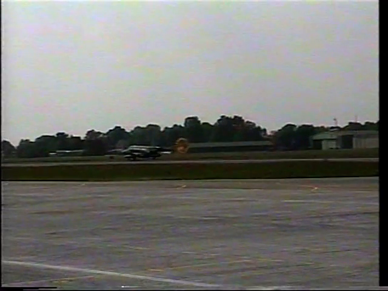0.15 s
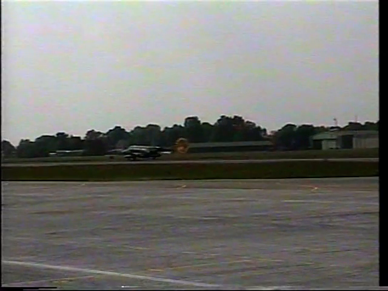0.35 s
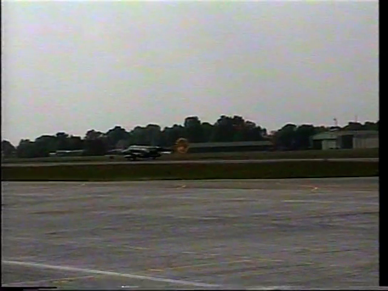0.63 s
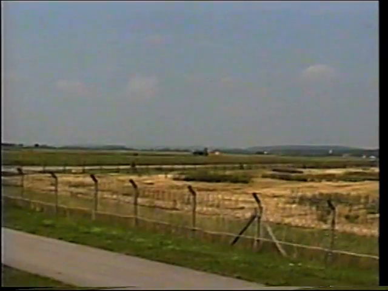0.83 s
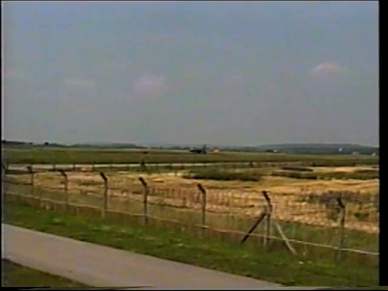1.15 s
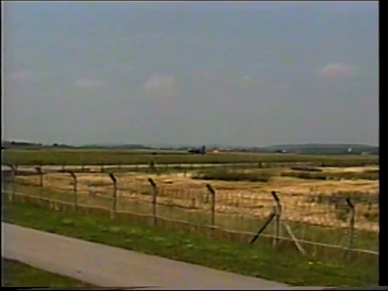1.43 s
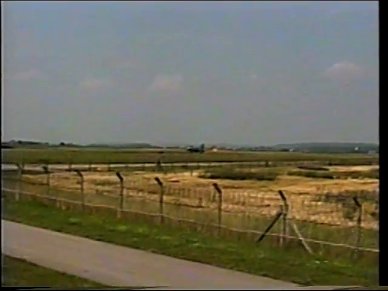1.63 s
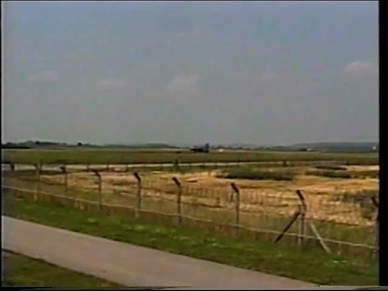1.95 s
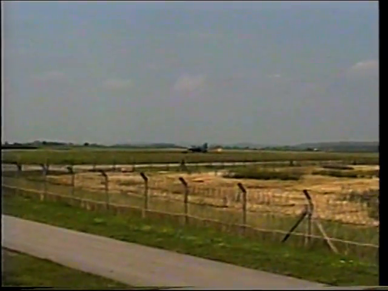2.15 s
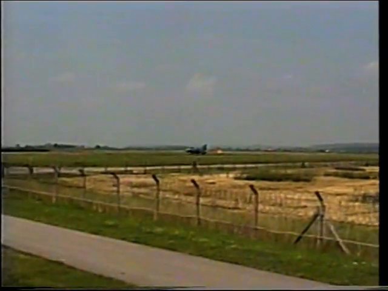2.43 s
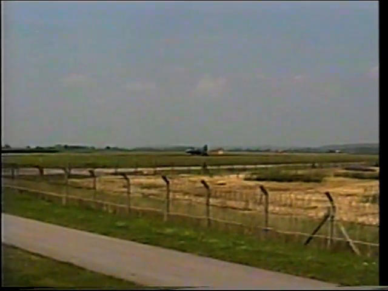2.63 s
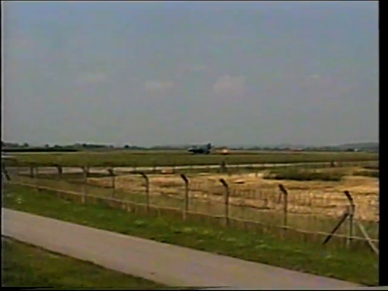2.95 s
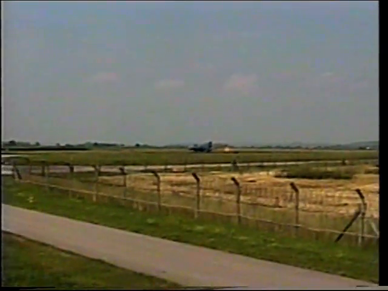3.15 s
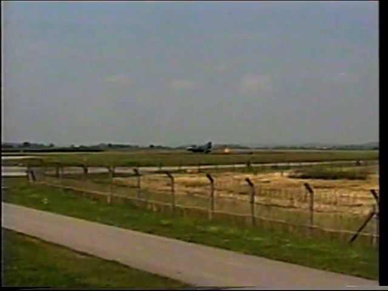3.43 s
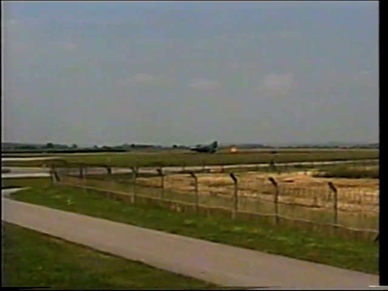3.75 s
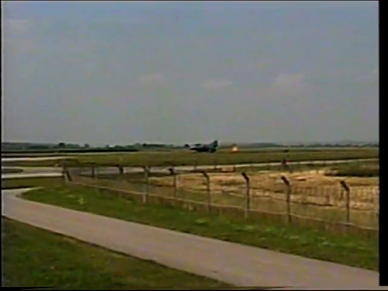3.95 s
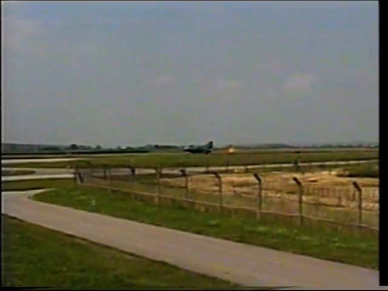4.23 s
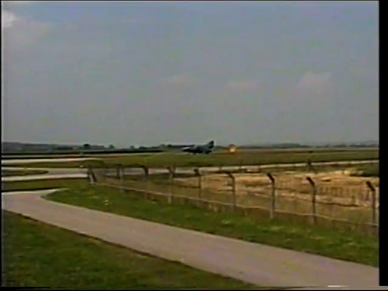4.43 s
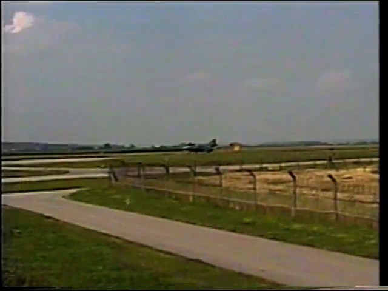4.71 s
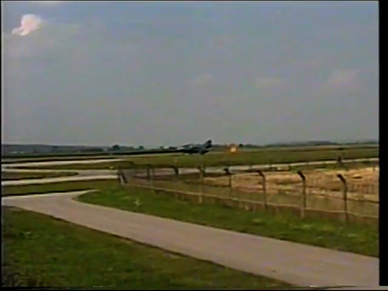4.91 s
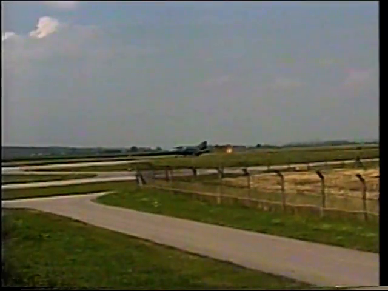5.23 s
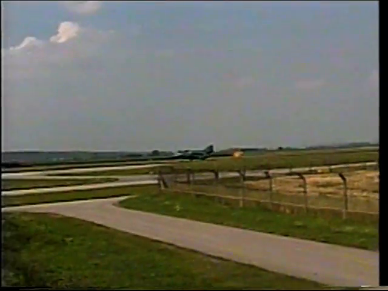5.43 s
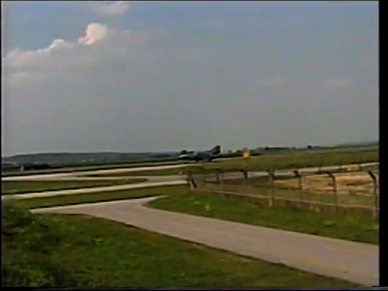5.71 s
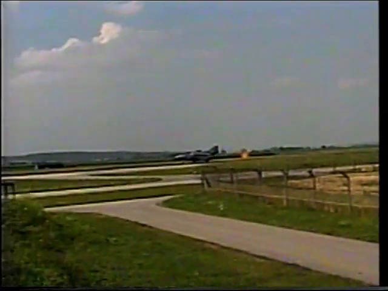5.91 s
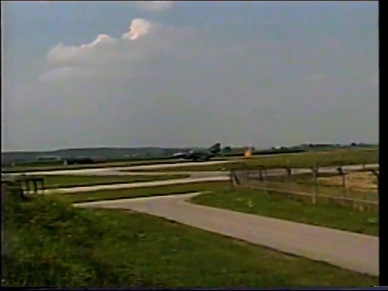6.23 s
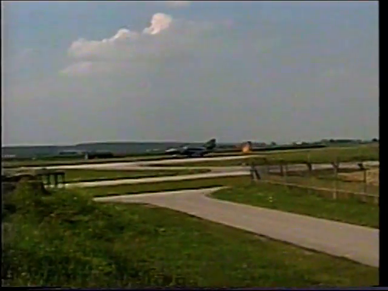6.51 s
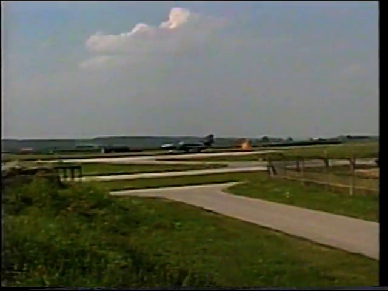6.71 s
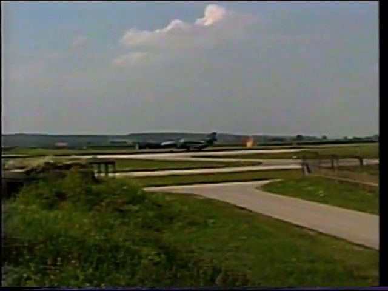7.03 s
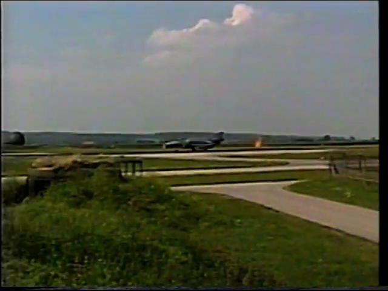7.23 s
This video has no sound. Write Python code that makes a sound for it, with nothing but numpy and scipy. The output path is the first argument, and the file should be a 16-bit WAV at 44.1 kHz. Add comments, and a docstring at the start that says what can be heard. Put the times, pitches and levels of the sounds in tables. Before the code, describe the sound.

A sudden cut-in from silence to a distant taxiing jet: wavering compressor whine gliding down, windy rush, faint insect rasp, then a louder finish.

```python
"""After a moment of silence a tape camcorder fades in quickly, with its own line whistle, frame buzz, hum and hiss.
A jet fighter is rolling along a runway after landing: compressor tones on multiples of the shaft speed sink
in pitch and fade in the restless air, over exhaust roar, intake hiss and low rumble, all of shaped noise.
A grasshopper rasps for the first second, two faint ticks follow, and the jet dips briefly.
It comes slowly nearer over open grass; late on, whine, intake noise and frame buzz swell."""
import sys
import numpy as np
from scipy import signal
from scipy.fft import rfft, irfft, next_fast_len
from scipy.io import wavfile
from scipy.ndimage import uniform_filter1d

SR = 44100
rng = np.random.default_rng(int(sys.argv[2]) if len(sys.argv) > 2 else 0)


def store_wav(level_fs):
    """Save 16-bit WAV to argv[1]."""
    pcm = np.round(np.clip(np.atleast_2d(level_fs), -1, 1) * 32767)
    wavfile.write(sys.argv[1], SR, pcm.T.astype(np.int16))


N = 324576
TIME = np.arange(N) / SR   # s

# tape hiss spectrum: (frequency [Hz], density [dB per Hz])
TAPE_HISS_SPECTRUM = [(3000, -2.5), (5000, 2.5), (7500, 4.5), (10000, -0.5), (13000, -4), (15500, -6)]
# gain of the frame buzz: (time [s], gain [dB])
FRAME_BUZZ_GAIN = [(0.75, -65), (6.3, -53), (6.65, -42), (6.85, -27.5), (7.1, -32), (7.36, -37)]
# hum at the field rate: (multiple of field rate [-], level [dB])
FIELD_HUM = [(1, -68), (2, -66)]
FRAME_HZ, LINE_HZ = 25, 15625.3
FRAME_START_S, BLANK_S = .0126, .0016
LINE_DB, TAPE_DB = -58.5, -70.5   # before ripple and flutter
START_S, FADE_S, CUTOFF_HZ = 0.7265, 0.024, 15780

# airfield rumble spectrum: (frequency [Hz], density [dB per Hz])
RUMBLE_SPECTRUM = [(20, -15), (35, -9), (55, -5), (90, -3), (130, -2), (200, -2.5), (400, -11.5)]
# airfield rumble: (time [s], level [dB])
RUMBLE_LEVEL = [(0.76, -48.5), (1.7, -53), (2.3, -53), (3.6, -50.5), (4.4, -49), (5.3, -53.5), (6.4, -53.5),
                (7.36, -55.5)]

# grasshopper strokes: run, rate, Gaussian width of a stroke, level, band
CHIRP_START_S, CHIRP_END_S, CHIRPS_PER_S = .79, 1.78, 17.8
CHIRP_SIGMA_S, CHIRP_DB, CHIRP_BAND_HZ = 0.0041, -69.5, (6530, 8160)
# faint sharp ticks: (time [s], gain before the band filter [dB])
TICK_GAINS = [(3.264, -45), (3.726, -40.5)]

# exhaust roar spectrum: (frequency [Hz], density [dB per Hz])
ROAR_SPECTRUM = [(90, -35), (140, -20.5), (185, -5.5), (245, -0.5), (300, -6), (380, -17.5), (600, -24.5)]
# low exhaust roar: (time [s], level [dB])
ROAR_LEVEL = [(0.76, -47.5), (1.3, -38), (1.54, -44), (2.74, -47.5), (2.84, -56.5), (3.32, -54),
              (3.54, -42), (3.96, -44), (4.04, -47.5), (4.7, -49.5), (5.32, -53), (6.46, -38.5),
              (6.75, -45), (7.36, -42)]
# hump of the roar, shifting as the path over the ground changes: (time [s], frequency [Hz])
ROAR_HUMP = [(0.75, 239), (1.3, 236), (1.8, 200.7), (2.4, 206.1), (3.0, 222.6), (3.7, 231.2), (4.3, 240.6),
             (4.8, 231.5), (5.3, 268.8), (5.9, 285), (6.4, 284.1), (6.9, 253.5), (7.36, 245.9)]
ROAR_CENTRE_HZ = 245   # hump of the unshifted roar
# mixing-jet rush spectrum: (frequency [Hz], density [dB per Hz])
JET_RUSH_SPECTRUM = [(250, -1), (400, 5), (520, 4.5), (750, 5), (1000, 2.5), (1250, -5), (1500, -15),
                     (2200, -20.5)]
# broad rush of the mixing jet: (time [s], level [dB])
JET_RUSH_LEVEL = [(0.76, -49.5), (0.92, -50.5), (1.28, -42.5), (1.52, -50), (2.28, -52.5), (2.6, -49),
                  (3.26, -52.5), (3.56, -49), (4.76, -50), (5.22, -47), (6.14, -47.5), (6.34, -43),
                  (7.36, -39)]

# intake rush spectrum, around the whine: (frequency [Hz], density [dB per Hz])
INTAKE_RUSH_SPECTRUM = [(1200, -5.5), (1450, -4.5), (1650, -4.5), (1850, 4), (2100, 4.5), (2400, -2.5),
                        (2800, 2), (3070, -8.5), (3400, -21)]
# intake hiss spectrum, above the whine: (frequency [Hz], density [dB per Hz])
INTAKE_HISS_SPECTRUM = [(2900, -12.5), (3100, 4.5), (3350, 6.5), (3900, 1.5), (4800, 0.5), (5400, -7.5),
                        (6100, -16.5), (7200, -14.5), (9000, -27), (13000, -42.5)]
# intake noise, swelling as the jet comes nearer: (time [s], rush level [dB], hiss level [dB])
INTAKE_LEVELS = [(0.76, -57, -63.5), (2.24, -54, -60.5), (2.34, -52, -60.5), (2.52, -51.5, -57),
                 (2.6, -55.5, -59), (2.8, -52, -56), (3.4, -53, -59.5), (4.52, -51, -55),
                 (4.78, -47.5, -51), (4.92, -47, -52), (5.28, -49.5, -53.5), (5.42, -46.5, -47),
                 (5.58, -45, -52.5), (5.8, -49, -55), (5.9, -46, -49.5), (6.06, -43, -52.5),
                 (6.38, -49.5, -55), (6.6, -44.5, -50.5), (6.86, -35, -41.5), (7.36, -39.5, -46)]
# hiss tilt: base slope [dB/octave]; below FULL_BRIGHT_DB it dulls by DULLING [dB/octave per dB]
BRIGHT_TILT_DB, FULL_BRIGHT_DB, DULLING = 1.3, -55, 1.23
GUST_DB, GUST_PER_S = 1.13, 13

# shaft speed as heard: (time [s], speed [turns/s])
SHAFT_SPEED = [(0.73, 283.63), (1.4, 281.55), (2.1, 279.84), (2.8, 278.26), (3.6, 276.34), (4.3, 273.89),
               (5, 271.3), (5.6, 269.99), (6.2, 267.46), (6.8, 265.16), (7.36, 262.81)]
LOWER_ORDER, UPPER_ORDER = 7, 9   # strong blade tones, multiples of the shaft speed
# lower blade tone, swelling with the wind and the approach: (time [s], level [dB])
LOWER_TONE_LEVEL = [(0.76, -54.5), (0.98, -49.5), (1.26, -50.5), (1.32, -44), (1.78, -54), (2.0, -41.5),
                    (2.2, -53), (2.3, -41.5), (2.58, -47.5), (2.78, -43.5), (3.74, -51), (3.82, -43.5),
                    (4.08, -56.5), (4.5, -48.5), (4.92, -41.5), (5.38, -36.5), (5.76, -45), (5.96, -39.5),
                    (6.46, -48.5), (6.94, -27), (7.26, -38.5), (7.36, -31.5)]
# upper blade tone: (time [s], level [dB])
UPPER_TONE_LEVEL = [(0.76, -63), (2.5, -47.5), (2.62, -57.5), (2.78, -42), (2.98, -57), (4.34, -58.5),
                    (4.88, -48), (5.26, -57), (6.12, -44), (6.3, -52.5), (6.66, -46), (6.82, -33.5),
                    (7.36, -34.5)]
# weaker engine tones: (multiple of shaft speed [-], level re intake rush [dB], width [Hz])
WEAK_TONES = [(8, -13, 5.5), (10, -9.5, 15.4), (11, -19, 3.8), (13, -40, 8), (16, -22, 10), (17, -21, 10),
              (19, -35, 7), (21, -32.5, 5.3)]
STEADYING = .38   # scatter lost as a blade tone strengthens, dB per dB
OCTAVE_DB = -30.5   # lower tone's octave, re that tone
# faint tone between the shaft's multiples, and its octave, both re intake rush
BETWEEN_RATIO, BETWEEN_DB, BETWEEN_OCTAVE_DB = 7.68, -15, -19

# brief dip of the jet: centre, half width to 1/e of the dB depth, depth
LULL_S, LULL_WIDTH_S, LULL_DB = 3.752, .02, -4.5


def from_db(db):
    """Decibels to gain."""
    return 10 ** (np.asarray(db) / 20)


def rms_one(x):
    """Scale to unit rms."""
    return x / np.sqrt(np.mean(x ** 2) + 1e-20)


def in_time(rows):
    """Each column of a curve, joined by straight lines."""
    s, *columns = np.transpose(rows)
    return [np.interp(TIME, s, c) for c in columns]


def bandpass(x, order, band_hz):
    """Butterworth band filter."""
    return signal.sosfilt(signal.butter(order, band_hz, "band", fs=SR, output="sos"), x)


def drift(rate_per_s):
    """Slow random curve of spread 1: two-pole filtered noise at a hundredth of the sample rate."""
    pole = np.exp(-200 * np.pi * rate_per_s / SR)
    noise = rng.standard_normal(N // 100 + 1002)
    slow = signal.lfilter([1], [1, -2 * pole, pole * pole], noise)[1000:]   # drop the settling
    return np.interp(np.arange(N) / 100, np.arange(len(slow)), rms_one(slow))


def turbulence(spectrum, patchy_db, flutter_per_s, tilt_db=0, count=6):
    """Noise of a given spectrum, rms 1 before its bands swell and fade on their own; tilt in dB/octave."""
    size = next_fast_len(N)
    octave = np.log2(np.maximum(np.fft.rfftfreq(size, 1 / SR), 1))
    freqs_hz, levels_db = np.transpose(spectrum)
    points = np.log2(freqs_hz)
    outside = np.abs(octave - np.clip(octave, points[0], points[-1]))
    shape_db = np.interp(octave, points, levels_db) - 24 * outside   # 24 dB/octave skirts
    bins = rfft(rng.standard_normal(size)) * from_db(shape_db)
    bins /= np.std(irfft(bins, size))
    pivot = np.average(points, weights=from_db(levels_db))
    centres = np.linspace(points[0], points[-1], count)
    out = 0
    for centre, share in zip(centres, np.eye(count)):
        band = irfft(bins * np.interp(octave, centres, share), size)[:N]
        gain_db = patchy_db * drift(flutter_per_s) + tilt_db * (centre - pivot)
        out = out + band * from_db(gain_db)
    return out


def shifted(noise, ratio):
    """Reading a noise faster raises its whole spectrum."""
    return np.interp(np.cumsum(ratio) % N, np.arange(N), noise)


def scattered(width_hz):
    """Many shifting air paths give a tone random strength and phase; mean power 1."""
    return (drift(width_hz) + 1j * drift(width_hz)) / np.sqrt(2)


def camcorder(thump_s, thump_hz, line_ripple, crackle_db):
    """Picture signal leaks into the sound: frame thumps, field hum, broken line whistle; plus tape hiss."""
    in_frame_s = (TIME - FRAME_START_S) % (1 / FRAME_HZ)
    in_field_s = in_frame_s % (.5 / FRAME_HZ)   # two fields per frame
    blank = in_field_s < BLANK_S
    thumps = bandpass(np.exp(-in_frame_s / thump_s), 2, [35, thump_hz])
    crackle = from_db(crackle_db) * blank * rng.standard_normal(N)
    buzz = from_db(in_time(FRAME_BUZZ_GAIN)[0]) * (thumps + crackle)
    # the whistle ripples along each field, and flips over, weak, in the blank gap
    ripple = 1 + line_ripple * np.cos(8 * np.pi * FRAME_HZ * in_field_s)
    strength = np.where(blank, -.15, ripple)
    whistle = np.sqrt(2) * np.sin(2 * np.pi * LINE_HZ * TIME) * strength
    hiss = turbulence(TAPE_HISS_SPECTRUM, patchy_db=2.5, flutter_per_s=6, count=2)
    hum = 0
    for multiple, level_db in FIELD_HUM:
        hum = hum + from_db(level_db) * np.sqrt(2) * np.sin(4 * np.pi * FRAME_HZ * multiple * TIME)
    return buzz + hum + from_db(LINE_DB) * whistle + from_db(TAPE_DB) * hiss


def airfield_rumble():
    """Low noise whose bands waver gently."""
    rumble = turbulence(RUMBLE_SPECTRUM, patchy_db=0.7, flutter_per_s=6.9, count=3)
    return from_db(in_time(RUMBLE_LEVEL)[0]) * rumble


def grasshopper():
    """An even run of short rasps: high band noise under Gaussian strokes."""
    since_s = (TIME - CHIRP_START_S) % (1 / CHIRPS_PER_S)
    active = (TIME > CHIRP_START_S) * (TIME < CHIRP_END_S)
    strokes = np.exp(-.5 * (since_s / CHIRP_SIGMA_S - 2) ** 2) * active
    rasp = rms_one(bandpass(rng.standard_normal(N), 2, CHIRP_BAND_HZ))
    return from_db(CHIRP_DB) * strokes * rasp


def ticks(decay_s, low_hz, high_hz):
    """Tiny bright snaps: band noise that starts at once and decays exponentially."""
    shape = 0
    for s, gain_db in TICK_GAINS:
        shape = shape + from_db(gain_db) * (TIME >= s) * np.exp(-np.abs(TIME - s) / decay_s)
    return bandpass(shape * rng.standard_normal(N), 2, [low_hz, high_hz])


def exhaust():
    """A low, billowing roar with a wandering hump, under the broad rush of the mixing jet."""
    roar_db, rush_db = in_time(ROAR_LEVEL)[0], in_time(JET_RUSH_LEVEL)[0]
    roar = turbulence(ROAR_SPECTRUM, patchy_db=1.62, flutter_per_s=6.8, count=4)
    roar = shifted(roar, in_time(ROAR_HUMP)[0] / ROAR_CENTRE_HZ)
    # when the roar swells against the rush, the rush deepens too
    darkening_db = uniform_filter1d(roar_db - rush_db, size=12000)
    rush_tilt_db = -.35 * (darkening_db + 0.5)
    rush = turbulence(JET_RUSH_SPECTRUM, patchy_db=1.02, flutter_per_s=8.8, tilt_db=rush_tilt_db, count=7)
    billow = from_db(0.89 * drift(14))
    return billow * (from_db(roar_db) * roar + from_db(rush_db) * rush)


def intake():
    """Rush and hiss swirl and flicker together in the moving air; the hiss brightens as it grows."""
    rush_db, hiss_db = in_time(INTAKE_LEVELS)
    tilt_db = BRIGHT_TILT_DB + DULLING * np.minimum(hiss_db - FULL_BRIGHT_DB, 0)
    rush = turbulence(INTAKE_RUSH_SPECTRUM, patchy_db=2.0, flutter_per_s=21, count=7)
    hiss = turbulence(INTAKE_HISS_SPECTRUM, patchy_db=3.0, flutter_per_s=8.6, tilt_db=tilt_db, count=11)
    gusts = from_db(GUST_DB * drift(GUST_PER_S))
    return gusts * (from_db(rush_db) * rush + from_db(hiss_db) * hiss)


def faint_tone(phase, level_db, width_hz):
    """A tone that arrives only by scattered paths."""
    return from_db(level_db) * rms_one(np.real(scattered(width_hz) * np.exp(1j * phase)))


def blade_tone(phase, level_db, scatter, width_hz):
    """A direct sine and its scattered part beat and fade; steadier when the tone is strong."""
    share = scatter * from_db(-STEADYING * (level_db - level_db.mean()))
    paths = (1 + share * scattered(width_hz)) / np.sqrt(1 + share ** 2)
    return from_db(level_db) * np.sqrt(2) * np.real(paths * np.exp(1j * phase))


def whine():
    """Compressor tones, all locked to one slightly unsteady shaft phase."""
    speed_hz = in_time(SHAFT_SPEED)[0] * (1 + 0.000493 * drift(5.5))
    turn = 2 * np.pi * np.cumsum(speed_hz) / SR   # rad
    lower_db, upper_db = in_time(LOWER_TONE_LEVEL)[0], in_time(UPPER_TONE_LEVEL)[0]
    rush_db = in_time(INTAKE_LEVELS)[0]
    out = blade_tone(LOWER_ORDER * turn, lower_db, scatter=0.75, width_hz=13.7)
    out += blade_tone(UPPER_ORDER * turn, upper_db, scatter=0.8, width_hz=17)
    out += faint_tone(2 * LOWER_ORDER * turn, lower_db + OCTAVE_DB, width_hz=4.7)
    for order, level_db, width_hz in WEAK_TONES:
        out += faint_tone(order * turn, rush_db + level_db, width_hz)
    out += faint_tone(BETWEEN_RATIO * turn, rush_db + BETWEEN_DB, width_hz=7.6)
    out += faint_tone(2 * BETWEEN_RATIO * turn, rush_db + BETWEEN_OCTAVE_DB, width_hz=12)
    return out


def scene():
    """The jet, dipping once, over airfield rumble, grasshopper and ticks."""
    background = airfield_rumble() + grasshopper() + ticks(decay_s=0.0014, low_hz=4500, high_hz=9900)
    dip = from_db(LULL_DB * np.exp(-((TIME - LULL_S) / LULL_WIDTH_S) ** 2))
    jet = dip * (exhaust() + intake() + whine())
    return (background + jet)[None]


def record(dry):
    """The camcorder adds its own noises, starts with a quick fade and cuts the top."""
    running = np.clip((TIME - START_S) / FADE_S, 0, 1)
    own_noise = camcorder(thump_s=0.0018, thump_hz=900, line_ripple=0.2, crackle_db=-23)
    taped = (dry + own_noise) * running
    lowpass = signal.firwin(1501, CUTOFF_HZ, fs=SR, window="blackman")
    return signal.fftconvolve(taped, lowpass[None], "same")


dry = scene()
out = record(dry)
store_wav(out)
```